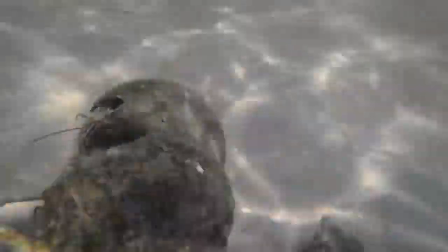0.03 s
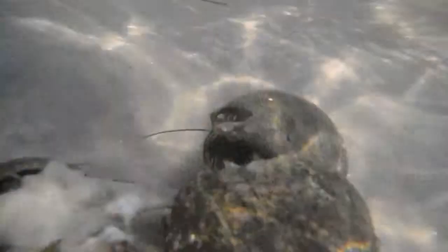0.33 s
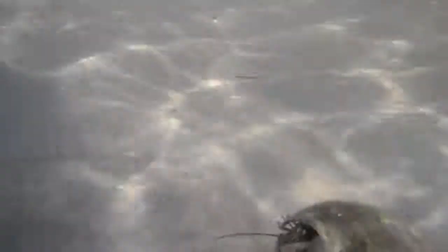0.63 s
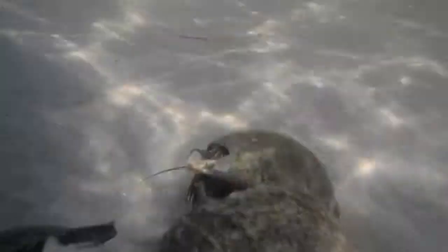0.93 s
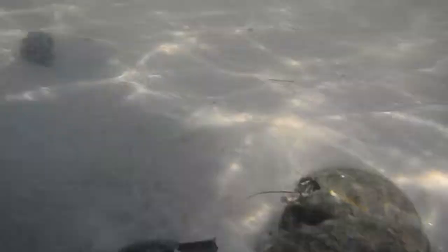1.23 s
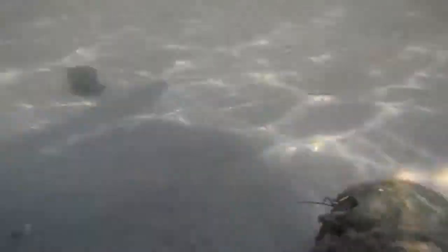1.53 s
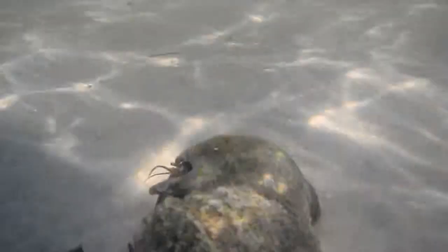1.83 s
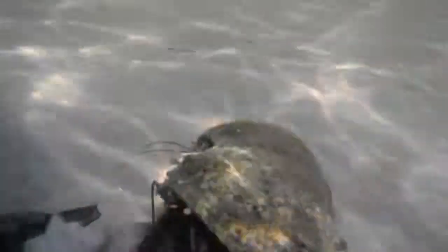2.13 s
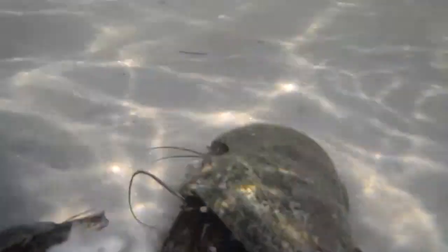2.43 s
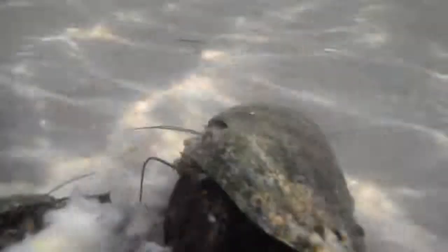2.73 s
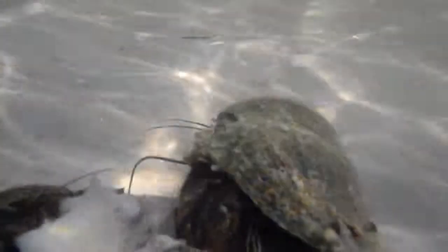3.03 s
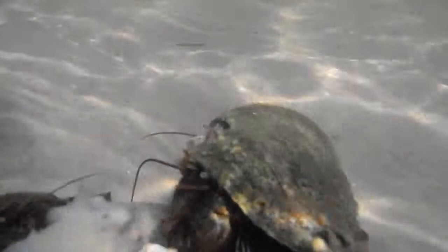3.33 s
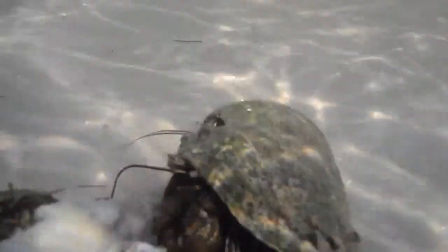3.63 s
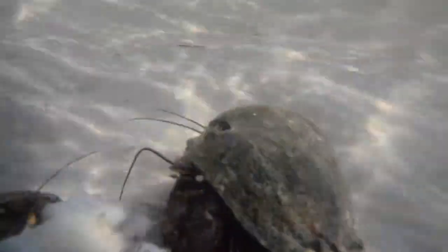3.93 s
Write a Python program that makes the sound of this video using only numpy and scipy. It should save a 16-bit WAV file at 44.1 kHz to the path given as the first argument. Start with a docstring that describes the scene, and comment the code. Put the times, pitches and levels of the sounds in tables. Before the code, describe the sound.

Moving water rumbles and washes throughout, muffled by a submerged camera case, over a faint crackle. Dull handling knocks come between 0.5 and 1.2 seconds, with sharp ticks and a few tiny bubble pings. From 1.3 to 2.1 seconds the case rings with a fluttering hollow hum, joined by gritty ticks and creaks. The water then quietens, and a steady wash returns from about 3 to 4 seconds.

```python
"""Camera housing in shallow sea water

Just over the sand, moving water rumbles and washes against a watertight case that rings near 640 Hz.
The grip knocks on the case, its shell ticks and creaks, and a few tiny bubbles ping nearby
over a fine crackle. One microphone inside the case hears it all through a fast limiter."""
import sys
import numpy as np
from scipy import signal
from scipy.fft import rfft, irfft
from scipy.io import wavfile
from scipy.ndimage import uniform_filter1d, minimum_filter1d

SR = 44100
rng = np.random.default_rng(int(sys.argv[2]) if len(sys.argv) > 2 else 0)


def to_wav(sig):
    """Store sig (one row per channel, or 1-D mono) as 16-bit WAV at the path in sys.argv[1].

    Samples outside -1..1 are clipped; the rate is SR.
    """
    pcm = np.clip(np.atleast_2d(sig), -1, 1) * 32767
    pcm = np.round(pcm).astype(np.int16)
    wavfile.write(sys.argv[1], SR, pcm.T)  # frames by channels


N = 176400


def water():
    """Moving water: low rumble, case boom near 200 Hz, wash along the case, even background."""
    # envelopes (time [s], level [dB])
    rumble_level = [(0, -40), (.42, -34.5), (.8, -29), (1.17, -30.5), (1.45, -38), (1.68, -31),
                    (2.28, -38.5), (2.6, -42.5), (4, -46)]
    boom_level = [(0, -31), (.9, -24.5), (1.28, -29), (1.451, -35.5), (1.85, -29), (2.3, -36),
                  (2.64, -47.5), (2.72, -37.5), (4, -39)]
    wash_level = [(0, -28.5), (.45, -27), (.95, -26), (1.25, -27.5), (1.42, -32.5), (1.54, -26),
                  (1.9, -28.5), (2.05, -27.5), (2.15, -37), (2.58, -45), (2.945, -39.5), (2.957, -29),
                  (3.7, -29.5), (4, -31.5)]
    # spectra (frequency [Hz], relative density [dB])
    rumble_spectrum = [(17, -6), (38, -5.5), (80, 3), (120, 4.5), (165, -6), (320, -35)]
    boom_spectrum = [(125, -16.5), (182, 1.5), (224, -2), (278, -19), (384, -12.5), (484, -15),
                     (1150, -64.5)]
    wash_spectrum = [(150, -31), (300, -11.5), (380, -6.5), (500, -4.5), (580, 1), (640, 6), (695, 3.5),
                     (770, -9.5), (900, -14.5), (1030, -12.5), (1300, -34), (1700, -28), (2000, -105.5)]
    background_spectrum = [(400, -6.5), (800, -6), (1035, 3), (1255, 0), (1390, -5), (1520, 0.5),
                           (1660, -9.5), (1875, -25), (2085, -24), (3400, -35.5), (4830, -38),
                           (14000, -54.5)]
    rumble = level(rumble_level) * turbulence(rumble_spectrum, flicker_db=1.47)
    boom = level(boom_level) * turbulence(boom_spectrum, flicker_db=1.47)
    wash = level(wash_level) * turbulence(wash_spectrum, flicker_db=1.5)
    background = from_db(-41.5) * turbulence(background_spectrum, flicker_db=2)
    return rumble + boom + wash + background


def case_tone():
    """The main case resonance sings for almost a second, fluttering."""
    # envelope (time [s], level [dB])
    tone_level = [(1.24, -53.5), (1.3, -22), (1.42, -31.5), (1.52, -22.5), (1.58, -26), (1.86, -26.5),
                  (1.95, -37.5), (1.99, -27), (2.055, -21.5), (2.09, -68)]
    tone_hz, wander_hz, flutter_db = 635, 3.48, 2
    t = np.arange(N) / SR
    wave = np.sqrt(2) * sine(tone_hz + wander_hz * drift(39.2))
    sounding = (t > tone_level[0][0]) & (t < tone_level[-1][0])
    return wave * level(tone_level) * sounding * from_db(flutter_db * drift(45))


def grip_knocks():
    """Each push of the grip and its release set the low case modes ringing."""
    # pushes (time [s], impulse [dB], hardness [Hz])
    pushes = [(0.5103, 5.5, 910), (.523, -9, 434), (.625, 1, 2190), (0.629, -2.5, 1200), (0.8, -6, 603),
              (0.868, -19.5, 1100), (0.9936, -5, 673), (1.021, -9, 440), (1.105, -13.5, 356),
              (1.2041, -2, 540), (2.286, -25.5, 305)]
    # case modes (frequency [Hz], gain [dB], t60 [s])
    modes = [(73.6, 5, 0.0099), (180, -1.5, 0.03), (233, -4.5, 0.063), (376, 3.5, 0.025),
             (643, -10.5, 0.029), (1060, -22, 0.0045)]
    release_s, release_share = 0.0036, 0.22
    force, t = np.zeros(N), np.arange(SR // 50) / SR
    for s, db, hardness_hz in pushes:
        push = t * np.exp(-4 * np.pi * hardness_hz * t)
        push = from_db(db) * push / push.sum()
        add(force, s, -push)
        add(force, s + release_s, release_share * push)
    return sum(from_db(db) * ring(force, hz, t60_s) for hz, db, t60_s in modes)


def case_rubs():
    """Light rubs excite short swells of the main resonance."""
    # rubs (time [s], peak level [dB])
    rubs = [(0.728, -19), (0.877, -18), (1.745, -19), (2.233, -27), (2.276, -28), (2.422, -26.5)]
    rub_hz, wander_hz, rub_s = 642.7, 13.1, 0.027
    out = np.zeros(N)
    wave = np.sqrt(2) * sine(rub_hz + wander_hz * drift(71.6))
    swell = np.sin(np.linspace(0, np.pi, int(rub_s * SR)))
    for s, db in rubs:
        add(out, s, from_db(db) * swell * wave[int(s * SR):][:len(swell)])
    return out


def shell_ticks():
    """Gritty slips of a few milliseconds with crackling tails, coloured by the shell."""
    # ticks and creaks (time [s], relative level [dB], tilt [dB/octave])
    ticks = [(0.133, -49, 8), (0.5146, -31, -7.5), (0.6262, -21, -4.5), (0.63, -26, -3.5),
             (0.8933, -28.5, 1.5), (1.142, -36, -3), (1.508, -36, -6), (1.534, -38.5, -8.5),
             (1.676, -28.5, -1), (1.7547, -30, 4.5), (1.7607, -32, -5), (1.768, -35.5, -5.5),
             (1.7755, -37, 5.5), (1.8844, -35, 2), (1.903, -23, -2), (1.9126, -21.5, 2.5),
             (1.925, -28, 0.5), (1.9655, -32, 5.5), (2.1107, -34, 2.5)]
    # shell resonances (frequency [Hz], gain [dB])
    resonances = [(560, 2.5), (1010, 13), (1340, 1.5), (1610, 6), (1880, -8), (2130, -3), (2500, -11.5),
                  (2950, -3.5), (3450, -24.5), (4150, -26.5), (4620, -15.5), (6150, -36.5), (7100, -28.5),
                  (8250, -47.5), (9500, -36.5), (14100, -61)]
    gain_db, pivot_hz = 18.5, 2800
    slip_s, tail_s, tail_share, catch_db = 0.001044, 0.01, 0.059, 4.5
    out, t = np.zeros(N), np.arange(SR // 10) / SR
    lead = len(t) // 4  # room for the filter's pre-ring
    slip = t / slip_s * np.exp(-t / slip_s)
    tail = tail_share * np.exp(-t / tail_s)
    catches = from_db(catch_db * drift(280))
    hz = np.maximum(np.arange(len(t) // 2 + 1) * SR / len(t), 1)
    shell_hz, shell_db = np.transpose(resonances)
    shell = from_db(np.interp(np.log(hz), np.log(shell_hz), shell_db))
    shell /= 1 + (shell_hz[0] / hz) ** 4  # low cut
    # the shell scrapes along: a scatter of weaker, duller ticks
    scrape = [(s, -43.5 + 3 * rng.standard_normal(), -5) for s in rng.uniform(1.49, 1.94, size=26)]
    for s, db, tilt_db_per_oct in ticks + scrape:
        envelope = slip + tail * catches[int(s * SR):][:len(t)]
        grit = np.roll(envelope * rng.standard_normal(len(t)), lead)
        tilted_gain = from_db(db + gain_db + tilt_db_per_oct * np.log2(hz / pivot_hz))
        add(out, s - slip_s - lead / SR, irfft(rfft(grit) * shell * tilted_gain))
    return out


def ringing_shell(ticks):
    """Ticks plus the brief ring they leave in the shell."""
    # shell modes (frequency [Hz], gain at resonance [dB], t60 [s])
    modes = [(1032, -3, 0.028), (2954, -2, 0.037), (4700, -1, 0.12)]
    return ticks + sum(from_db(db) * 2 * np.log(1000) / (t60_s * SR) * ring(ticks, hz, t60_s)
                       for hz, db, t60_s in modes)


def shell_taps():
    """Small hard taps each ring one damped, woody note of the shell."""
    # taps (time [s], pitch [Hz], peak level [dB])
    taps = [(.6265, 2220, -25.5), (0.8928, 2695, -26.5), (2.2688, 2800, -40), (2.700, 3030, -53),
            (2.719, 3070, -50), (2.905, 2900, -42)]
    rise_s = 0.001
    out, t = np.zeros(N), np.arange(SR // 50) / SR
    envelope = t / rise_s * np.exp(1 - t / rise_s)
    for s, hz, db in taps:
        add(out, s, from_db(db) * envelope * np.sin(2 * np.pi * hz * t))
    return out


def bubbles():
    """Each small bubble rings briefly, wobbles and rises in pitch."""
    # bubbles (time [s], starting pitch [Hz], level [dB])
    pings = [(0.317, 4670, -51), (0.4195, 4500, -47), (0.4627, 2380, -26), (.757, 1663, -16.5),
             (1.041, 2570, -29.5), (1.257, 7000, -59), (2.112, 4480, -36), (2.113, 6680, -53)]
    attack_s, t60_s, rise_per_s = 0.00082, 0.034, 3.5
    out, t = np.zeros(N), np.arange(SR // 25) / SR
    envelope = (1 - np.exp(-t / attack_s)) * np.exp(-np.log(1000) * t / t60_s)
    wobble = 0.046 * drift(500)
    for s, hz, db in pings:
        pitch_hz = hz * (1 + rise_per_s * t + wobble[int(s * SR):][:len(t)])
        add(out, s, from_db(db) * envelope * sine(pitch_hz))
    return out


def crackle():
    """Dense tiny grains heard through the case."""
    # envelope (time [s], level [dB])
    crackle_level = [(0, -52), (.7, -45.5), (1.2, -46.5), (1.36, -55.5), (1.85, -46), (2.2, -54),
                     (4, -58.5)]
    # grain spectrum (frequency [Hz], relative density [dB])
    spectrum = [(940, -16), (1650, 20.5), (1900, -0.5), (2120, 5.5), (2450, -1), (2930, 1), (3150, -6.5),
                (3430, -23.5), (4700, -18.5), (5600, -33.5), (11500, -46)]
    grains_per_s, spread_db = 2000, 3
    onsets = rng.random(N) < grains_per_s / SR
    sizes = from_db(spread_db * np.minimum(rng.exponential(1, N), 5))
    signs = rng.choice([-1, 1], N)
    return level(crackle_level) * colour(onsets * sizes * signs, spectrum)


def turbulence(spectrum, flicker_db):
    """Flow noise with a flickering level."""
    return colour(rng.standard_normal(N), spectrum) * from_db(flicker_db * drift(23))


def colour(x, spectrum):
    """Filter x by (frequency [Hz], gain [dB]) rows, steep roll-off past the last; rms 1."""
    hz, db = np.transpose(spectrum)
    bins_hz = np.maximum(np.arange(N // 2 + 1) * SR / N, 1)
    gain = from_db(np.interp(np.log(bins_hz), np.log(hz), db))
    roll_off = 1 / np.maximum(bins_hz / hz[-1], 1) ** 4
    return unit_rms(irfft(rfft(x) * roll_off * gain, N))


def drift(rate_hz):
    """Smooth random motion, mostly below rate_hz; rms 1."""
    hz = np.arange(N // 2 + 1) * SR / N
    return unit_rms(irfft(rfft(rng.standard_normal(N)) / (1 + (hz / rate_hz) ** 2) ** 2, N))


def ring(x, hz, t60_s):
    """One mode: a unit click starts a decaying sine of height 1."""
    r, w = np.exp(-np.log(1000) / (t60_s * SR)), 2 * np.pi * hz / SR
    return signal.lfilter([0, np.sin(w)], [1, -2 * r * np.cos(w), r * r], x + 1e-18)


def level(rows):
    """Gain curve from (time [s], level [dB]) rows."""
    s, db = np.transpose(rows)
    return from_db(np.interp(np.arange(N) / SR, s, db))


def sine(hz):
    return np.sin(2 * np.pi * np.cumsum(hz) / SR)


def from_db(db):
    return 10 ** (np.asarray(db) / 20)


def unit_rms(x):
    return x / np.sqrt(np.mean(x ** 2) + 1e-20)


def add(out, start_s, x):
    i = int(start_s * SR)
    out[i:i + len(x)] += x[:N - i]


def scene():
    """Mono sum at the microphone inside the case."""
    mix = (water() + crackle() + case_tone() + case_rubs() + grip_knocks()
           + ringing_shell(shell_ticks()) + shell_taps() + bubbles())
    return mix[None]


def record(dry):
    """A fast limiter holds down the hardest knocks; a low-pass cuts the top."""
    ceiling, reaction_s, stopband_hz = 0.62, 0.00076, 15800
    window = int(reaction_s * SR)
    gain = minimum_filter1d(ceiling / np.maximum(np.abs(dry), ceiling), window)
    gain = uniform_filter1d(uniform_filter1d(gain, window // 2), window // 2)
    low_pass = signal.cheby2(12, 70, stopband_hz, fs=SR, output="sos")
    return signal.sosfilt(low_pass, dry * gain)


dry = scene()
out = record(dry)
to_wav(out)
```